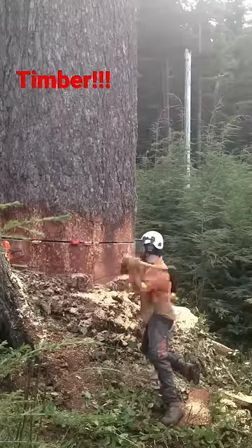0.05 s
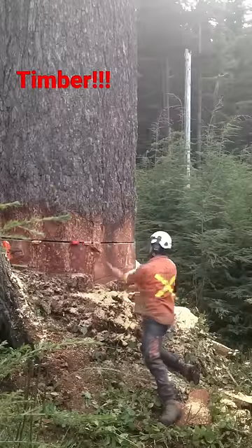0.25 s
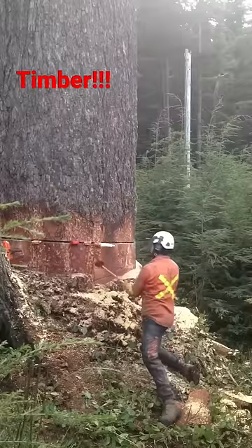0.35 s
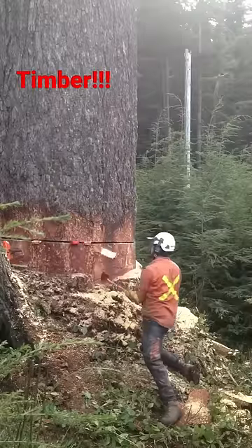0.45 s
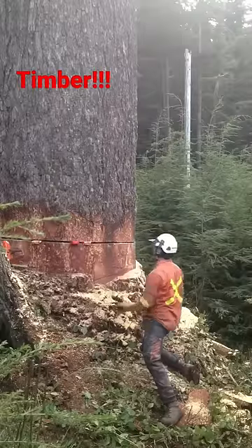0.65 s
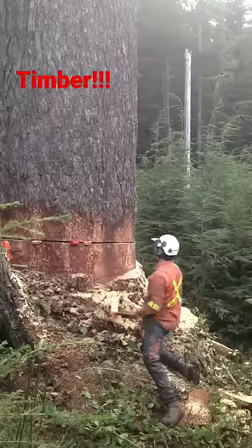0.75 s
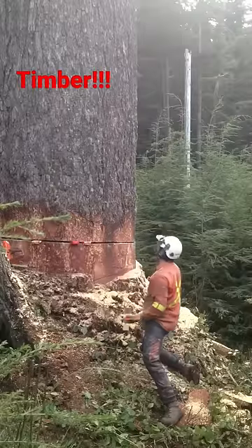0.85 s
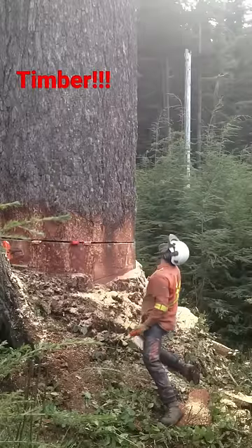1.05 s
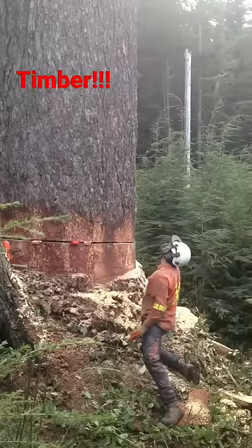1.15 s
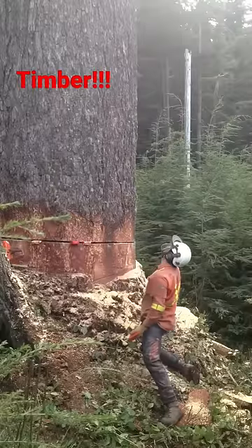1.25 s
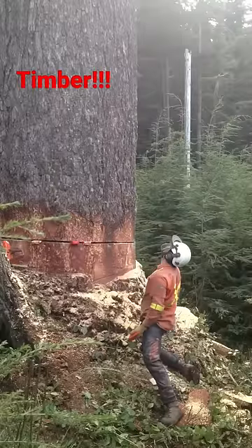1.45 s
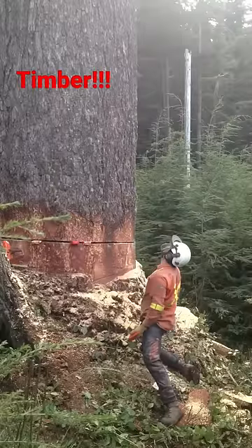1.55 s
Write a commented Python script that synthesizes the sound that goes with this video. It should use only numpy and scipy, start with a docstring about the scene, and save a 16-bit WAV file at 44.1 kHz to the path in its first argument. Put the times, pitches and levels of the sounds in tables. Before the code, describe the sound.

An axe strikes a wedge in a tree trunk with one sharp, echoing crack.

```python
"""Axe on a felling wedge

A logger swings at a wedge in the cut of a huge standing tree: a dull glancing knock, then a hard crack
that booms in the trunk and scatters through the hushed forest. The wedge jumps out; steel clinks, and
loose pieces clack and thud over chips and roots. Knocks are bursts of coloured noise; wood and steel
ring as decaying sines."""
import sys
import numpy as np
from scipy import signal
from scipy.fft import rfft, irfft
from scipy.io import wavfile
from scipy.ndimage import uniform_filter1d

SR = 44100
rng = np.random.default_rng(int(sys.argv[2]) if len(sys.argv) > 2 else 0)


def transcribe(signal):
    """Save signal, clipped to [-1, 1], as a 16-bit WAV file at the path in sys.argv[1]."""
    frames = np.atleast_2d(signal).T
    limited = np.clip(frames, -1, 1)
    pcm = np.round(limited * 32767).astype(np.int16)
    wavfile.write(sys.argv[1], SR, pcm)


N = 70560
T = np.arange(N) / SR
BURST_SAMPLES = 16384


def from_db(db):
    """Decibels to gain."""
    return 10 ** (np.asarray(db) / 20)


def decay(t, t60):
    """A fade of 60 dB every t60 seconds."""
    return from_db(-60 * np.maximum(t, 0) / max(t60, 1e-4))


def contact(t, db, attack, t60):
    """Envelope of one contact: a quick rise, then a decay."""
    return from_db(db) * np.clip(t / max(attack, 1e-5), 0, 1) * decay(t - attack, t60)


def colour(x, curve, flatten=False, smooth_hz=210):
    """Minimum-phase EQ through (Hz, dB) points; flatten first evens out the sound's chance humps."""
    size = 2 * len(x)
    spectrum = rfft(x, size)
    hz, db = np.transpose(curve)
    grid = np.maximum(np.fft.rfftfreq(size, 1 / SR), 1)
    log_gain = np.log(from_db(np.interp(np.log(grid), np.log(hz), db)))
    if flatten:
        power = uniform_filter1d(np.abs(spectrum) ** 2, int(smooth_hz * size / SR) + 1)
        log_gain -= .5 * np.log(power + 1e-20)
    cepstrum = irfft(log_gain) * np.r_[1, np.full(len(x) - 1, 2), np.zeros(len(x))]
    return irfft(spectrum * np.exp(rfft(cepstrum)))[:len(x)]


def burst(start, envelope, curve):
    """Fibres give way: a short puff of noise, coloured by the struck body."""
    noise = colour(envelope * rng.standard_normal(BURST_SAMPLES), curve, flatten=True)
    noise *= np.linalg.norm(envelope) / np.linalg.norm(noise)
    return np.pad(noise, (max(int(start * SR), 0), N))[:N]


def knocks(hits, curve):
    """One noise burst for each hit."""
    return sum(burst(start, contact(T[:BURST_SAMPLES], db, attack, t60), curve)
               for start, db, attack, t60 in hits)


def ring(hits, modes):
    """Each hit sets the modes ringing as decaying sines."""
    tones = sum((-1) ** k * from_db(db) * np.sin(2 * np.pi * hz * T) * decay(T, t60)
                for k, (hz, db, t60) in enumerate(modes))
    return sum(from_db(db) * np.interp(T - start, T, tones, left=0) for start, db in hits)


# The dark tone of the air. Each row: frequency in Hz, gain in dB.
AIR_EQ = [(30, -27.5), (90, -19), (160, -0.5), (250, 0), (550, -5), (1200, -9.5), (2000, -15), (2750, -12),
          (3500, -18), (5200, -18.5), (6400, -15.5), (8700, -25), (15000, -25.5)]
# Its fader ride. Each row: time in seconds, level in dB.
AIR_FADER = [(0, -64), (0.14, -68.5), (0.8, -69), (1.6, -67.5)]

def air():
    """Still forest air lays a soft hush under everything."""
    hush = colour(rng.standard_normal(N), AIR_EQ)
    return hush / hush.std() * from_db(np.interp(T, *np.transpose(AIR_FADER)))


# The faint rustle of an earlier blow dying away, then clacks and scuffs.
# Each row: start in seconds, level in dB, attack and t60 in seconds, ring gain in dB.
CLACK_HITS = [(0.0, -74.5, 0.0017, 0.072, -64), (0.185, -51.5, 0.0069, 0.18, -47),
              (0.6642, -57, .001, 0.042, -67), (0.6753, -41, 0.00034, 0.016, -75),
              (0.6784, -52, 0.00064, .025, -75), (0.835, -95, .002, 0.051, -69),
              (0.939, -48, .001, 0.018, -55), (0.946, -55, 0.0013, 0.014, -82),
              (0.9998, -54, 0.00039, .007, -77), (1.074, -28.5, 0.00086, 0.0054, -50),
              (1.078, -52, .001, 0.11, -63.5), (1.111, -47.5, 0.0046, 0.053, -59),
              (1.171, -55.5, 0.00031, .018, -53), (1.2763, -50.5, .0003, 0.012, -76),
              (1.2978, -50.5, .0005, .04, -51), (1.42, -65.5, 0.0039, 0.33, -63)]
# Their bright edge. Each row: frequency in Hz, gain in dB.
CLACK_EQ = [(50, -40.5), (250, -19.5), (800, -19), (1600, -16), (2700, -10), (3400, -12), (4300, -6.5),
            (5300, -5), (6300, 4), (7200, -2), (8300, -10.5), (10500, -14.5), (13000, -21.5),
            (15000, -32.5)]
# Short ringing tones after each clack, including a microphone resonance near 2.8 kHz.
# Each row: frequency in Hz, relative level in dB, t60 in seconds.
AFTER_RING = [(1710, -6.5, 0.015), (2585, -9, 0.2), (2790, -3, 0.059), (5950, 1, 0.029), (6420, -2, 0.0081)]

def rustle_and_clacks():
    """An earlier blow rustles away, then chips and wedge clack and scuff; short tones trail each hit."""
    bursts = knocks([hit[:4] for hit in CLACK_HITS], CLACK_EQ)
    return bursts + ring([(start, ring_db) for start, *_, ring_db in CLACK_HITS], AFTER_RING)


# Soft landings. Each row: start in seconds, level in dB, attack and t60 in seconds, pitch in Hz.
THUD_HITS = [(0.166, -58, 0.0038, 0.052, 405), (0.189, -59.5, 0.0039, .04, 560),
             (0.426, -50.5, 0.0018, 0.073, 261), (0.667, -45, 0.00093, 0.024, 223.7),
             (0.9384, -43.5, .001, .025, 700), (0.9525, -51.5, .002, 0.022, 1578),
             (0.938, -54.5, 0.0014, 0.063, 232), (1.117, -48.5, 0.0026, 0.014, 167),
             (1.268, -57.5, .002, .03, 1000), (1.3591, -51.5, 0.0021, 0.011, 279.7)]

def thuds(rise_db_per_oct=18.5, fall_db_per_oct=10.5, depth_db=59.5):
    """Damped bumps on roots and soft ground, each a broad hump of noise around its own pitch."""
    below, above = 2 ** (depth_db / rise_db_per_oct), 2 ** (depth_db / fall_db_per_oct)
    return sum(knocks([hit], [(hz / below, -depth_db), (hz, 0), (hz * above, -depth_db)])
               for *hit, hz in THUD_HITS)


# The glance, the double blow and the trunk's slow boom.
# Each row: start in seconds, level in dB, attack in seconds, t60 in seconds.
GLANCE_HITS = [(0.1738, -22, .002, 0.031)]
BLOW_HITS = [(0.2042, -5, .0003, .008), (0.2059, -2.5, .0002, .012)]
BOOM_HITS = [(0.21, -50, .035, 0.48)]
# Their tones: dull, hard and deep. Each row: frequency in Hz, gain in dB.
GLANCE_EQ = [(40, -30), (150, -15), (290, 3.5), (520, -3), (850, -1), (1500, -9), (2700, -11), (3500, -25),
             (5300, -18), (7000, -27.5), (9500, -44), (15000, -59.5)]
CRACK_EQ = [(40, -41.5), (150, -31.5), (300, -6), (500, -5), (640, 3), (860, 4), (1000, -2), (1220, 1.5),
            (1550, -5.5), (2000, 0), (2750, 4), (3300, -7.5), (4200, -10), (4800, 0.5), (5600, -5),
            (7000, 1), (8000, -9), (10500, -20), (12500, -21), (15000, -32)]
BOOM_EQ = [(30, -25), (85, -27), (125, -9.5), (163, 5), (205, -12), (400, -28.5), (2000, -60)]
# The ring of wedge and trunk. Each row: frequency in Hz, level in dB, t60 in seconds.
WOOD_RING = [(340, -35.5, .05), (634, -24, 0.039), (867, -26.5, .04), (1143, -31.5, .06),
             (1230, -28, 0.033), (2032, -31.5, 0.045), (2740, -23, .055), (4630, -25.5, 0.01),
             (6680, -24.5, .025), (7180, -24.5, .027)]

def axe():
    """The head glances on the wood, lands and drives home in a double crack; the trunk rings and booms."""
    lands, drives_home = BLOW_HITS[0][0], BLOW_HITS[1][0]
    power = sum(contact(T[:BURST_SAMPLES] + lands - start, db, attack, t60) ** 2
                for start, db, attack, t60 in BLOW_HITS)
    crack = burst(lands, np.sqrt(power), CRACK_EQ)
    wood = ring([(drives_home, 0)], WOOD_RING)
    return knocks(GLANCE_HITS, GLANCE_EQ) + crack + wood + knocks(BOOM_HITS, BOOM_EQ)


# The tone of the forest reverb. Each row: frequency in Hz, near gain in dB, far gain in dB.
SCATTER_EQ = [(70.5, -1, -14.5), (160, 7, -5), (300, 0, -12), (550, 4.5, -16.5), (793, 1, -17.5),
              (990, 8, -8), (1160, 9, -6.5), (1520, 7.5, -12), (2340, 5.5, -15.5), (2850, 9, -13),
              (3580, 6.5, -18), (5000, 0, -21), (6450, 7, -16), (8500, 6, -25), (14000, 4.5, -31.5)]
# Slapbacks off single big trees. Each row: delay in seconds, level before EQ in dB.
SLAPS = [(0.113, -34), (0.153, -36.5), (0.222, -44)]
# Their midrange tone. Each row: frequency in Hz, gain in dB.
SLAP_EQ = [(200, -16), (600, -3.5), (1150, 3), (2700, -1.5), (4000, -17), (12000, -20.5)]
NEAR_T60_S, FAR_T60_S, SCATTER_ONSET_S = .27, 1.2, .007
FOLIAGE_HZ, FOLIAGE_T60_S = 4470, 1.7  # needles soak up the treble: an extra fade above this frequency

def forest(send, slap_attack_s=.003, slap_t60_s=.038):
    """Dense scatter from near trunks, a long tail from afar and a few slapbacks, all dulling with time."""
    hz, near_db, far_db = np.transpose(SCATTER_EQ)
    white = rng.standard_normal((3, N)) / np.sqrt(SR)
    near = colour(white[0], np.c_[hz, near_db]) * decay(T, NEAR_T60_S)
    far = colour(white[1], np.c_[hz, far_db]) * decay(T, FAR_T60_S)
    slap_envelope = sum(contact(T - delay, db, slap_attack_s, slap_t60_s) for delay, db in SLAPS)
    slap_envelope /= np.sqrt(np.sum(decay(T, slap_t60_s) ** 2) / SR)
    slaps = colour(white[2], SLAP_EQ) * slap_envelope
    response = (near + far) * np.clip(T / SCATTER_ONSET_S, 0, 1) + slaps
    dull = signal.sosfiltfilt(signal.butter(2, FOLIAGE_HZ, fs=SR, output="sos"), response, padtype=None)
    treble = (response - dull) * decay(T, FOLIAGE_T60_S)
    return signal.fftconvolve(send, dull + treble)[:N]


# Touches on the steel. Each row: start in seconds, gain in dB.
STEEL_HITS = [(0.676, -16.5), (0.6787, -0.5), (1.0742, -14.5), (1.112, -16.5)]
# Its thin ring. Each row: frequency in Hz, level in dB, t60 in seconds.
STEEL_RING = [(960, -58, 0.096), (2046, -40, 0.12), (3086, -46, 0.075), (4220, -40.5, 0.03),
              (6050, -36.5, 0.012), (6480, -34, 0.03), (7180, -37, 0.018)]

def steel_clinks():
    """Steel rings briefly each time it is touched."""
    return ring(STEEL_HITS, STEEL_RING)


def scene():
    """The sounds at the tree, each with its own send to the forest reverb, over a bed of air."""
    blow, clacks, bumps, steel = axe(), rustle_and_clacks(), thuds(), steel_clinks()
    send = blow + from_db(4.5) * clacks + from_db(-1) * bumps + from_db(2) * steel
    return (blow + clacks + bumps + steel + forest(send) + air())[None]


NOTCH_HZ, NOTCH_Q, CLIP_LEVEL, HIGH_CUT_HZ = 3086, 19, .97, 15400

def record(dry):
    """The microphone has a narrow notch; the loudest peaks are rounded and the top is cut."""
    notched = signal.lfilter(*signal.iirnotch(NOTCH_HZ, NOTCH_Q, fs=SR), dry)
    rounded = notched / (1 + (notched / CLIP_LEVEL) ** 4) ** .25
    return signal.sosfiltfilt(signal.ellip(10, .1, 60, HIGH_CUT_HZ, fs=SR, output="sos"), rounded)


dry = scene()
out = record(dry)
transcribe(out)
```